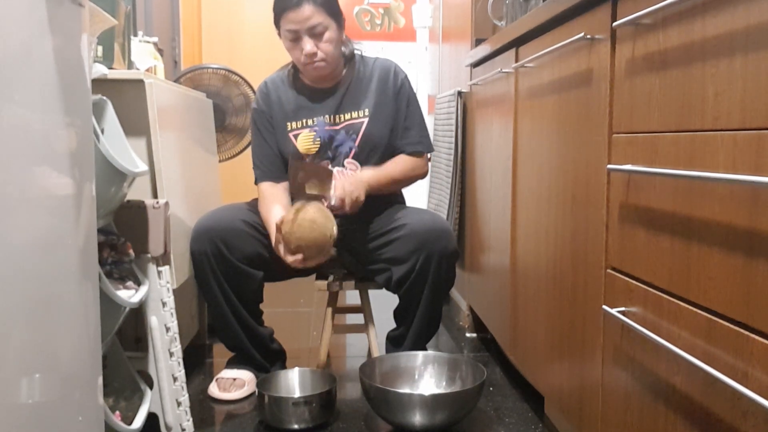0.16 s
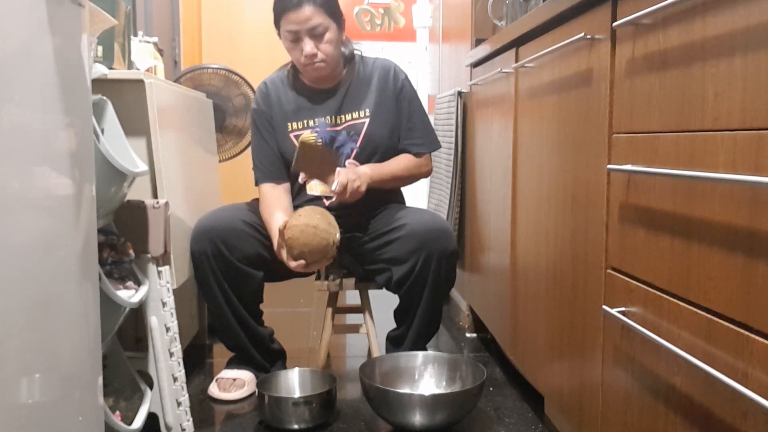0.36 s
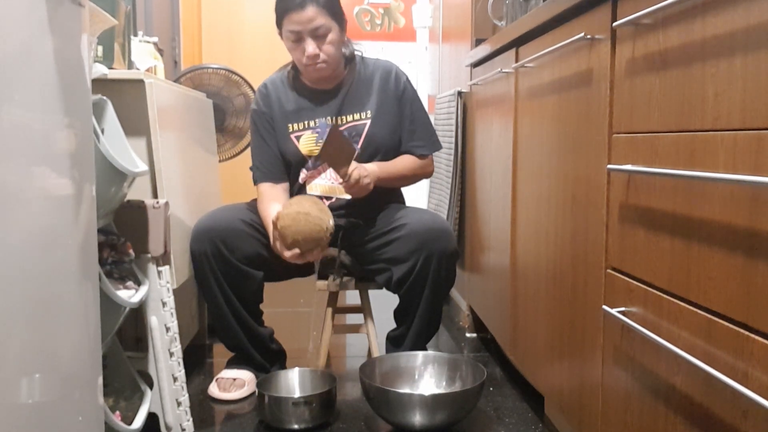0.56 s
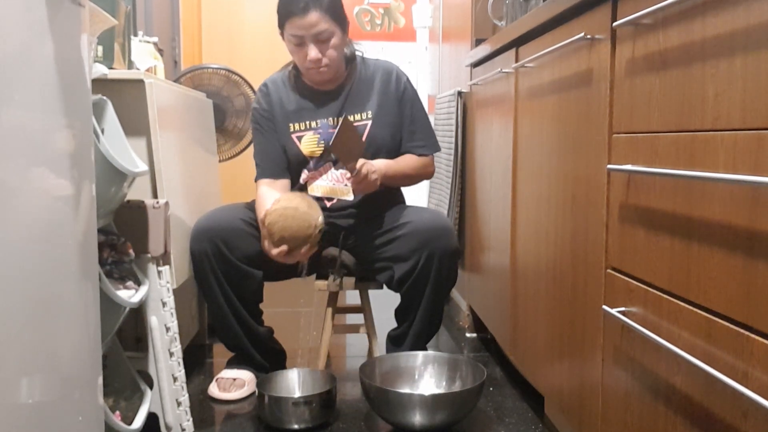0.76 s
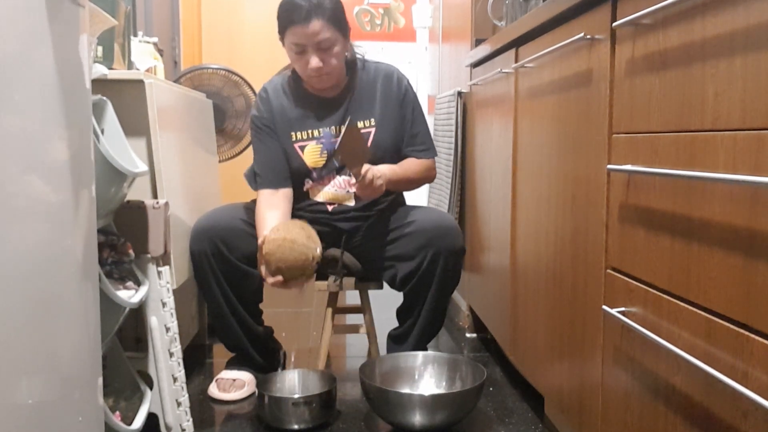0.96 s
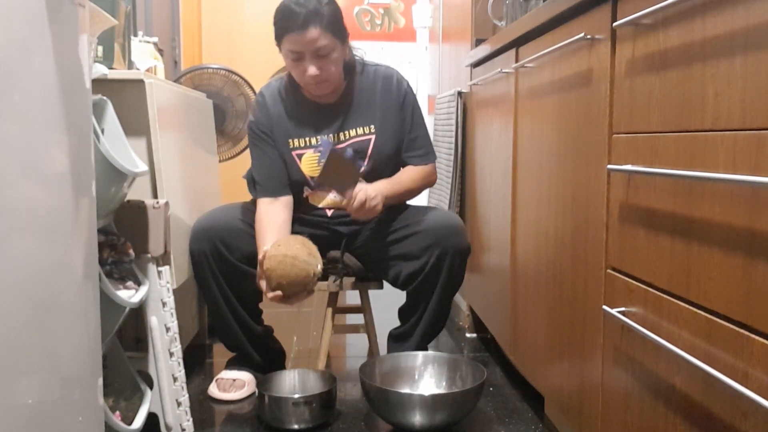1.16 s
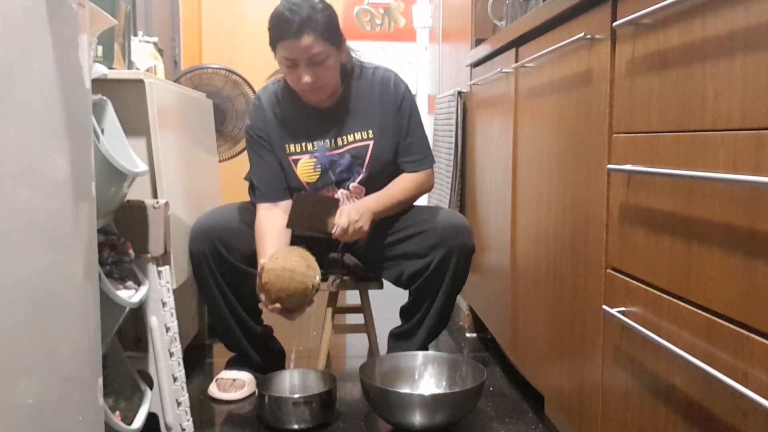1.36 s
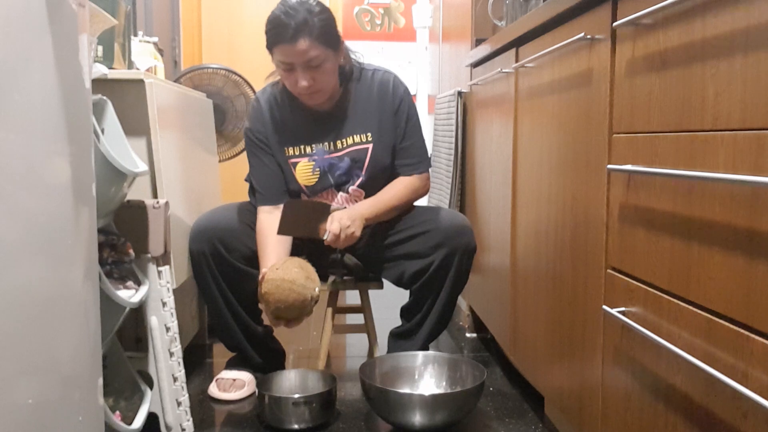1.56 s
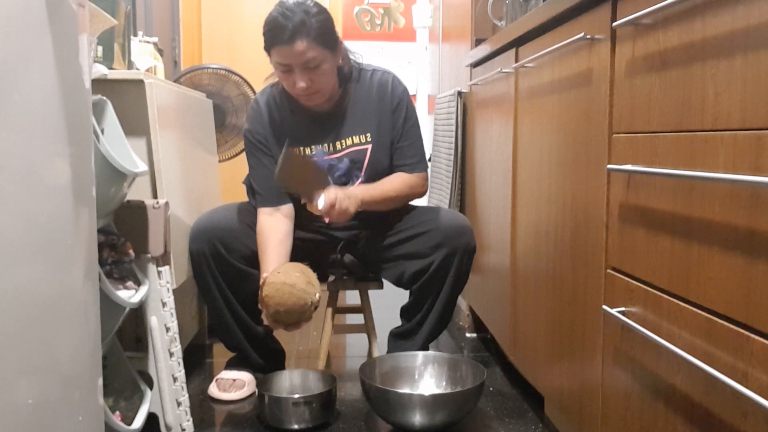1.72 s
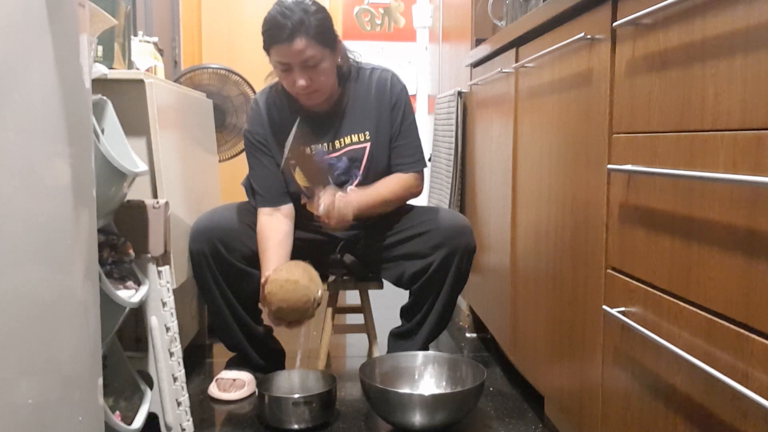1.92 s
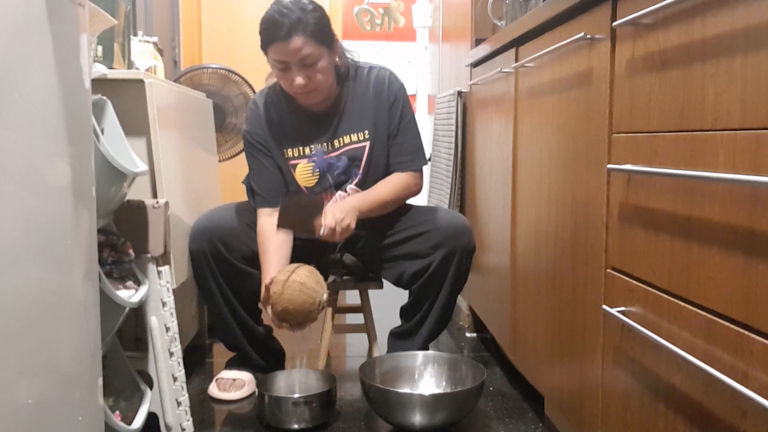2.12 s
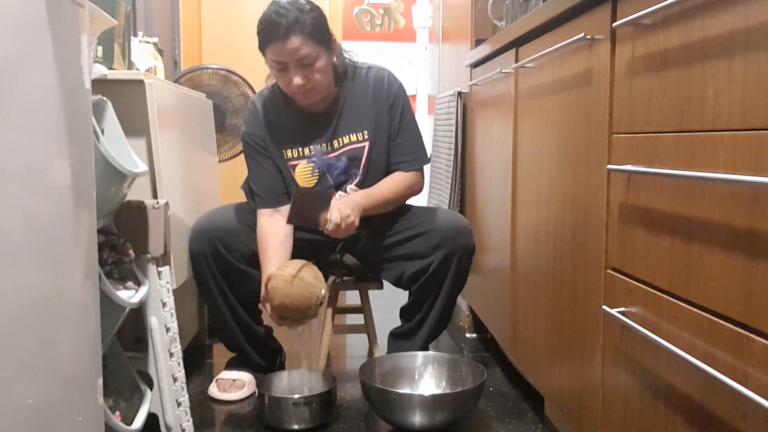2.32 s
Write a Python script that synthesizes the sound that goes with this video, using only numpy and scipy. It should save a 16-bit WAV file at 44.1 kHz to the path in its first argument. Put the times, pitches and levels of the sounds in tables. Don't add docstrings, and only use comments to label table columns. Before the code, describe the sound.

Heavy knife knocks twice on a hard coconut shell, juice dripping into a steel bowl between

```python
import sys
import numpy as np
from scipy import signal
from scipy.fft import rfft, irfft
from scipy.io import wavfile
from scipy.ndimage import uniform_filter1d

SR = 44100
rng = np.random.default_rng(int(sys.argv[2]) if len(sys.argv) > 2 else 0)


def to_linear_factor(level_db):
    exponent = np.asarray(level_db, float) / 20
    return 10 ** exponent


def pcm_store(signal):
    levels = np.round(np.clip(np.atleast_2d(signal), -1, 1) * 32767)
    wavfile.write(sys.argv[1], SR, levels.astype(np.int16).T)


N = 103635

# pitch_hz, level_db (per Hz)
HUM_COLOUR = [(30, -5), (60, -7.5), (122, -2), (165, -13.5), (450, -13), (880, -19), (1050, -28),
              (3300, -33.5)]
# time_s, swell_db
HUM_SWELL = [(0, -0.5), (.35, 1.5), (.6, 1.5), (.9, 2), (1.15, 7), (1.5, 2.5), (1.75, 0), (1.95, 1.5),
             (2.35, -0.5)]
# start_s, peak_db, bubble_hz, bubble_db, splat_tilt_db_per_octave
DRIPS = [(0.508, -41.5, 9000, -2, -1.5), (0.533, -37.5, 8850, -21, 3), (0.6232, -34.5, 4200, -15, 2.5),
         (0.8112, -34, 7930, -0.5, 3.5), (0.8521, -35.5, 9540, 8.5, 1), (0.8752, -35, 10500, -7, -3.5),
         (0.907, -27, 4420, -8.5, -1.5), (1.047, -24, 4040, -13, -3), (1.1658, -27.5, 10400, 6.5, 7.5),
         (1.2173, -35, 10900, -20, -2.5), (1.2496, -30.5, 10550, -4, 4), (1.291, -33, 3190, -9, -4.5),
         (1.3181, -33.5, 7340, -3.5, 1), (1.4703, -30, 12300, -9, 16.5), (1.555, -45, 9850, 15.5, 6.5),
         (1.5761, -31, 4520, -5.5, -3), (1.6383, -29, 2920, -20, -3.5), (1.6742, -54, 8800, 16, -21),
         (1.7154, -28.5, 2910, -47, -2), (1.76, -28, 10400, -14, -2), (1.791, -37.5, 4300, 0.5, -3),
         (1.8576, -32.5, 9900, -16, -5), (2.2598, -30.5, 10500, -3, -5), (2.3204, -32, 11200, 2, -2.5),
         (.032, -60, 10300, 9, 2.5), (.139, -45.5, 2000, -4, -22), (0.5423, -39.5, 8540, -12, 4.5),
         (.6095, -41, 10400, -10, 15), (.868, -44, 5100, 1, 10), (1.228, -37, 6100, -2, -5),
         (1.366, -37, 14800, -2, 5), (1.049, -36, 5860, -5, -1), (1.83, -44, 14300, 8, 11),
         (1.9574, -50, 12800, 4, 0), (1.979, -47, 10400, 7, 4), (1.179, -42, 9200, 0, 8)]
# pitch_hz, level_db (per Hz)
SPRAY_COLOUR = [(500, -24), (2000, -17.5), (4000, -12.5), (7600, -15), (8600, -6), (11000, -4),
                (15300, -13.5), (16500, -15.5)]
BLOW_STARTS = (.2048, 2.0237)
# peak_db, contact_ms, echo_db
BLOWS = [
    (-3, 2.5, 1),
    (-1.5, 0.8, -3),
]
# pitch_hz, level_db, t60_s
FIRST_RINGS = [(115, 7.5, 0.19), (205.4, 0.5, 0.19), (250, 9.5, 0.06), (301, 10.5, 0.056), (410, -6, 0.08),
               (509, 2, 0.17), (1527, -6.5, 0.14), (1890, -26, 0.14), (1990, -1.5, 0.28), (2330, -18, 0.11),
               (2480, 0, 0.19), (917, -7.5, 0.14), (647, -10, 0.11), (8560, -33, 0.3)]
SECOND_RINGS = [(100, -21.5, 0.12), (207.3, -21, 0.225), (349, -1, 0.026), (382, -2, 0.099),
                (442.3, -8, 0.14), (503.5, -11, 0.17), (560, -15.5, 0.14), (821, -15.5, 0.097),
                (903, -9.5, 0.074), (2432, -4, 0.021), (2977, -6.5, 0.021), (9000, -22, 0.12),
                (9740, -28, 0.11), (14300, -31, .12)]
RING_LEVELS = (-20.5, -6.5)
# pitch_hz, level_db (per Hz)
FIRST_CRACK = [(70, -73.5), (200, 2), (400, -3.5), (900, -12), (2100, -5.5), (6500, -28.5), (10500, -22),
               (16500, -35)]
SECOND_CRACK = [(70, -53.5), (300, -0.5), (734, -14), (2700, -12.5), (4500, -21.5), (6890, -33.5),
                (10000, -16.5), (16500, -31)]
# start_s, level_db, pitch_hz, t60_s
PINGS = [(.23, -38, 1997, .5), (.206, -66, 3900, 2.2), (2.025, -47, 1997, .45), (1.717, -43, 2950, .1),
         (1.71, -58, 1545, .3), (.88, -55, 1780, .1), (1.64, -45, 2850, .03), (1.648, -47, 3250, .05),
         (1.66, -48, 2850, .05), (1.672, -48, 3150, .05), (2.33, -52, 5000, .03), (1.055, -53, 1530, .1)]
# time_s, flow_db
FLOW = [
    [(0.45, -80), (0.56, -77), (.7, -78), (.79, -70.5), (0.87, -66), (1.0, -62.5), (1.04, -80),
     (1.065, -69), (1.15, -64), (1.3, -72.5), (1.43, -63), (1.54, -64), (1.66, -53), (1.76, -63.5),
     (1.874, -62.5), (2.0, -86)],
    [(2.1, -56), (2.198, -53.5), (2.242, -52), (2.35, -55)],
]
# start_s, level_db, pitch_hz
THUDS = [(0.72, -34, 63), (.8, -45, 55), (0.894, -43, 61), (.99, -47, 58.3), (1.062, -30, 69),
         (1.203, -36, 53), (1.333, -39, 124), (1.599, -38.5, 55), (1.664, -44, 65.3), (1.759, -36, 76),
         (2.251, -45, 60)]
# pitch_hz, t60_s, sag_per_s (as it fills)
BOWL_RINGS = [(570, 0.04, .1), (866, 0.2, .16), (1422, 0.12, .085)]
# start_s, low_ring_db, middle_ring_db, high_ring_db
SPLASHES = [(.885, -71, -56, -53), (.935, -69, -50, -62), (1.047, -43, -50, -51), (1.085, -60, -48, -60),
            (1.175, -47, -58, -53), (1.25, -56, -54, -58), (1.285, -47, -49, -62), (1.34, -60, -52, -57)]
# time_s, level_db
STREAM_LEVEL = [(.7, -84), (.9, -62), (1.0, -69), (1.06, -56.5), (1.2, -56.5), (1.42, -60.5), (1.55, -62.5),
                (1.66, -65), (1.9, -78)]
# time_s, level_db
SING_LEVEL = [(.76, -80), (.79, -60), (.86, -63), (.9, -59), (.975, -58), (1.0, -76), (1.05, -62),
              (1.4, -63), (1.46, -80)]
# pitch_hz, t60_s
ROOM_DECAY = [(100, 0.18), (500, 0.33), (2000, 0.28), (5000, 0.3), (10000, 0.4), (16000, 0.18)]
# pitch_hz, left_minus_right_db
PORTS = [(60, 9), (125, 1.5), (250, 0), (500, 3.5), (1000, 2), (2200, 5.5), (8000, 6), (15000, 4)]

BOWL_SAG_FROM_S = .95


def read(table, hz):
    a = np.array(table, float)
    return np.interp(np.log(np.maximum(hz, 1)), np.log(a[:, 0]), a[:, 1])


def colour(x, gain):
    n = x.shape[-1]
    return irfft(rfft(x) * gain(np.arange(n // 2 + 1) * SR / n), n)


def unit(x):
    return x / np.sqrt(np.mean(x ** 2))


def add(out, x, at_s):
    i = int(at_s * SR)
    n = min(len(x), N - i)
    out[i:i + n] += x[:n]


def wander(per_s, size):
    k = int(SR / per_s)
    steps = uniform_filter1d(rng.standard_normal(size), k)
    return unit(uniform_filter1d(steps, k))


def wide(size, wide_hz):
    mid, side = rng.standard_normal((2, size))
    share = lambda hz: 1 / (1 + (hz / wide_hz) ** 3)
    m = colour(mid, lambda hz: np.sqrt(1 + share(hz)))
    s = colour(side, lambda hz: np.sqrt(1 - share(hz)))
    return np.array([m + s, m - s]) / np.sqrt(2)


def click(gain, size=4096):
    cep = irfft(np.log(gain(np.arange(size // 2 + 1) * SR / size)))
    cep[1:size // 2] *= 2
    cep[size // 2 + 1:] = 0
    x = irfft(np.exp(rfft(cep)))
    return x / np.sqrt(np.sum(x ** 2))


def burst(len_s, gain, size=4096):
    x = rng.standard_normal(size) * np.exp(-np.arange(size) / SR / len_s)
    x = signal.fftconvolve(x, click(gain))[:size]
    return x / np.abs(x).max()


def rings(modes, size=30000):
    t = np.arange(size) / SR
    return sum(to_linear_factor(db - 60 * t / t60) * np.sin(2 * np.pi * hz * t) for hz, db, t60 in modes)


def hum():
    hum_db, hiss_db, wide_hz = -48, -71.5, 730
    time_s, swell_db = np.array(HUM_SWELL).T
    swell = np.interp(np.arange(N) / SR, time_s, swell_db)
    waver_db = 2.45 * wander(6, N)
    balance_db = np.array([[-.8], [.8]])
    treble_loss = lambda hz: 1 + (hz / 3600) ** 6
    bass_loss = lambda hz: 1 + (24 / (hz + 1)) ** 4
    tint = lambda hz: to_linear_factor(read(HUM_COLOUR, hz)) / treble_loss(hz) / bass_loss(hz)
    air = unit(colour(wide(N, wide_hz), tint))
    hiss = colour(rng.standard_normal((2, N)), lambda hz: 1 / (1 + (8800 / (hz + 1)) ** 8))
    return to_linear_factor(hum_db + waver_db + swell + balance_db) * air + to_linear_factor(hiss_db) * hiss


def drips():
    drip_db, splat_s, splat_peak_db = -5.5, .004, 3
    bubble_cycles, bubble_glide = 11, 0.022
    splat_room_db, bubble_room_db = 16, 0
    near, far, t = np.zeros(N), np.zeros(N), np.arange(4096) / SR
    for s, db, pitch_hz, bubble_db, tilt_db in DRIPS:
        u = t * pitch_hz / bubble_cycles
        phase = 2 * np.pi * pitch_hz * t * (1 + bubble_glide * np.minimum(u, 2))
        bubble = to_linear_factor(bubble_db) * np.exp(-u) * np.sin(phase)
        tilt = lambda hz: tilt_db * np.log2(np.clip(hz, 1500, 16000) / 8000)
        peak = lambda hz: splat_peak_db * np.exp(-(np.log2((hz + 1) / pitch_hz) / 0.17) ** 2)
        gain = lambda hz: to_linear_factor(read(SPRAY_COLOUR, hz) + tilt(hz) + peak(hz))
        level = to_linear_factor(db + drip_db)
        add(near, level * (burst(splat_s, gain) + bubble), s)
        add(far, level * (to_linear_factor(splat_room_db) * click(gain) + to_linear_factor(bubble_room_db) * bubble), s)
    return near, far


def waver(modes, contact_s):
    rise_cycles, waver_db, waver_per_s = 0.7, 2.5, 78
    t, out = np.arange(30000) / SR, 0
    for hz, db, t60 in modes:
        walk = wander(waver_per_s, len(t))
        rise = 1 - np.exp(-t / (contact_s + rise_cycles / hz))
        swell = to_linear_factor(waver_db * walk * np.minimum(t / 0.059, 1))
        out = out + rings([(hz, db, t60)]) * rise * swell
    return out


def blows():
    crack_s, crack_rise_s = 0.0048, .0012
    crack, ring, pulse = np.zeros((3, N))
    crack_rise = 1 - np.exp(-np.arange(4096) / SR / crack_rise_s)
    each = zip(BLOW_STARTS, BLOWS, (FIRST_RINGS, SECOND_RINGS), (FIRST_CRACK, SECOND_CRACK), RING_LEVELS)
    for s, (db, contact_ms, echo_db), modes, table, ring_db in each:
        gain = lambda hz: to_linear_factor(read(table, hz))
        add(crack, to_linear_factor(db) * burst(crack_s, gain) * crack_rise, s)
        add(pulse, to_linear_factor(echo_db + 15.5) * click(gain), s)
        add(ring, to_linear_factor(ring_db) * waver(modes, contact_ms / 1000), s)
    return crack + ring, pulse + to_linear_factor(-6.0) * ring


def pings():
    out = np.zeros(N)
    for s, db, hz, t60 in PINGS:
        add(out, rings([(hz, db, t60)]), s)
    return out


def spray():
    clicks_per_s, click_spread_db = 1300, -0.5
    fizz_per_s, fizz_db, fizz_cycles, fizz_spread_db = 350, 0, 4, 4.5
    t, db = np.arange(N) / SR, np.full(N, -120.)
    for part in FLOW:
        a = np.array(part)
        time_s = np.r_[a[0, 0] - .1, a[:, 0], a[-1, 0] + .05]
        db = np.maximum(db, np.interp(t, time_s, np.r_[-95, a[:, 1], -95]))
    chance, sign, size = rng.random((3, N))
    click_level = to_linear_factor(-click_spread_db * np.log(size + 0.0048))
    clicks = (chance < clicks_per_s / SR) * np.sign(sign - .5) * click_level
    fizz, u = np.zeros(N), np.arange(1024) / SR
    for when, pitch, size in rng.random((int(fizz_per_s * N / SR), 3)):
        hz = 3000 * 2 ** (2.4 * pitch)
        level = to_linear_factor(-fizz_spread_db * np.log(size + 0.011)) * np.sqrt(hz)
        bubble = np.exp(-u * hz / fizz_cycles) * np.sin(2 * np.pi * hz * u)
        add(fizz, level * bubble, when * N / SR)
    tint = lambda x: unit(colour(x, lambda hz: to_linear_factor(read(SPRAY_COLOUR, hz))))
    return to_linear_factor(db) * (tint(clicks) + to_linear_factor(fizz_db) * tint(fizz))


def thuds():
    out = np.zeros(N)
    for s, db, hz in THUDS:
        r = rings([(hz, db, 0.11)])
        add(out, r * np.minimum(np.arange(len(r)) / SR / 0.0055, 1), s)
    return out


def stream():
    taps_per_s, tap_spread_db, tap_hz, tap_octaves = 2500, 2.5, 695, 1.8
    upper_db, upper_from_s, waver_db = -3, .87, 4.5
    t = np.arange(N) / SR
    chance, size = rng.random((2, N))
    curve = lambda rows: to_linear_factor(np.interp(t, *np.array(rows).T, -120, -120))
    tap_level = rng.standard_normal(N) * to_linear_factor(-tap_spread_db * np.log(size + 0.011))
    taps = (chance < taps_per_s / SR) * tap_level
    tint = lambda hz: np.exp(-(np.log2((hz + 1) / tap_hz) / tap_octaves) ** 2)
    filled_s = np.maximum(t - BOWL_SAG_FROM_S, 0)
    voices = []
    for hz, t60, sag in BOWL_RINGS[1:]:
        level = to_linear_factor(waver_db * wander(25, N))
        pitch_hz = hz * (1 - sag * filled_s + .004 * wander(30, N))
        voices.append(level * np.sin(2 * np.pi * np.cumsum(pitch_hz) / SR))
    low, high = voices
    singing = low + to_linear_factor(upper_db) * (t > upper_from_s) * high
    return curve(STREAM_LEVEL) * unit(colour(taps, tint)) + curve(SING_LEVEL) * singing


def splashes():
    out = np.zeros(N)
    for s, *levels in SPLASHES:
        filled_s = max(s - BOWL_SAG_FROM_S, 0)
        modes = [(hz * (1 - sag * filled_s), db, t60) for (hz, t60, sag), db in zip(BOWL_RINGS, levels)]
        r = rings(modes)
        add(out, r * np.minimum(np.arange(len(r)) / SR / 0.0026, 1), s)
    return out


def room(x, size=22050):
    build_s, wide_hz = 0.00032, 413
    t, noise, tail = np.arange(size) / SR, wide(size, wide_hz), 0
    for c in 50 * 2. ** np.arange(9):
        octave = lambda hz: np.clip(np.log2((hz + 1) / c), -1, 1)
        band = colour(noise, lambda hz: np.cos(np.pi / 2 * octave(hz)) ** 2)
        tail = tail + band * to_linear_factor(-60 * t / read(ROOM_DECAY, c))
    tail = tail * (1 - np.exp(-t / build_s))
    tail = tail / np.sqrt(np.mean(np.sum(tail ** 2, axis=1)))
    return signal.fftconvolve(x[None], tail, axes=1)[:, :N]


def scene():
    knock_lag, water_lag = 4, -2
    knock, knock_far = blows()
    drops, drops_far = drips()
    fine = spray()
    steel = pings() + thuds() + stream() + splashes()
    water = drops + fine + steel
    wet = room(knock_far + drops_far + to_linear_factor(-2) * fine + to_linear_factor(-3) * steel)
    right = np.roll(knock, knock_lag) + np.roll(water, water_lag)
    both = np.array([knock + water, right]) + wet + hum()
    left_port = colour(both[0], lambda hz: to_linear_factor(read(PORTS, hz) / 2))
    right_port = colour(both[1], lambda hz: to_linear_factor(-read(PORTS, hz) / 2))
    return np.array([left_port, right_port])


def top_cut(x):
    return signal.sosfilt(signal.butter(12, 16860, fs=SR, output="sos"), x)


def record(dry):
    clip, low_cut_hz, top_hz = .9, 41, 15750
    fade_in = np.minimum(np.arange(N) / 200, 1)
    rounded = clip * np.tanh(dry / clip) * fade_in
    low_cut = signal.butter(4, low_cut_hz, "high", fs=SR, output="sos")
    high_cut = signal.ellip(12, .3, 65, top_hz, fs=SR, output="sos")
    mix = signal.sosfilt(high_cut, signal.sosfilt(low_cut, rounded))
    return top_cut(mix)


dry = scene()
out = record(dry)
pcm_store(out)
```